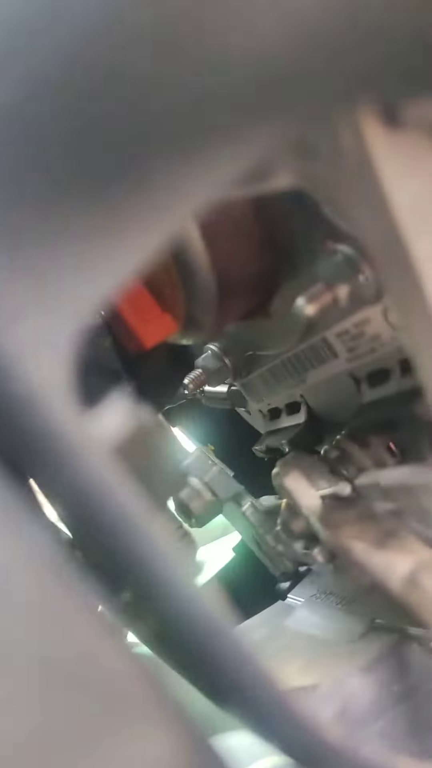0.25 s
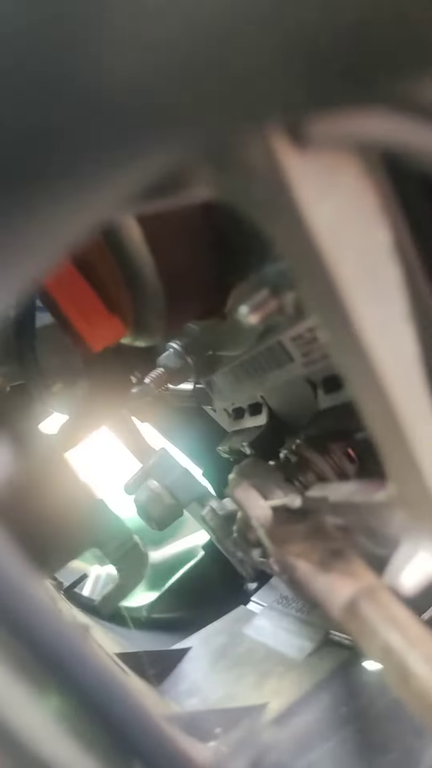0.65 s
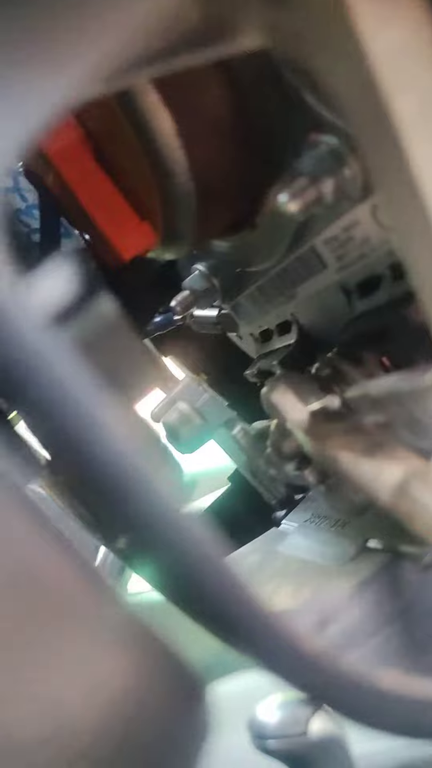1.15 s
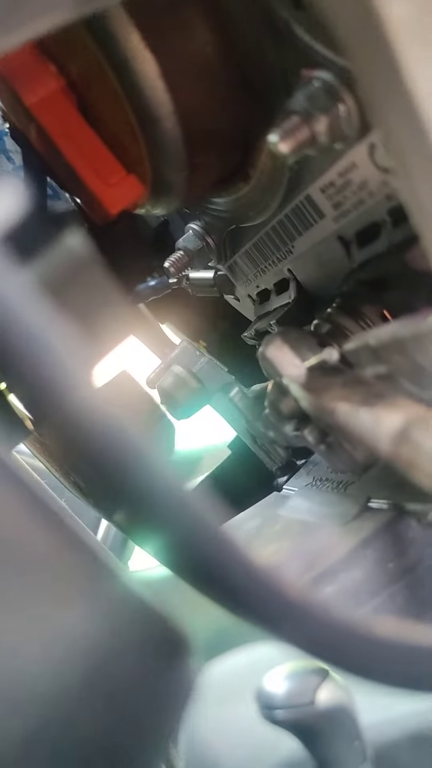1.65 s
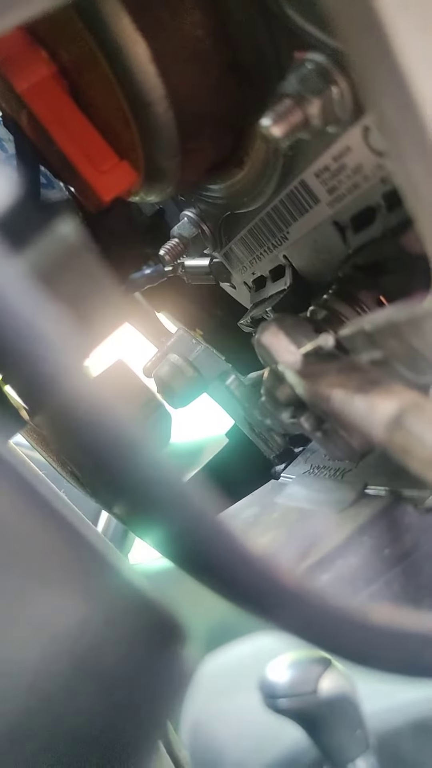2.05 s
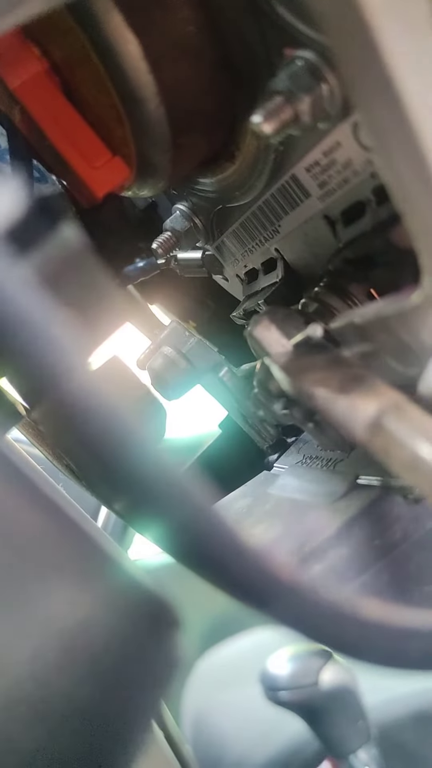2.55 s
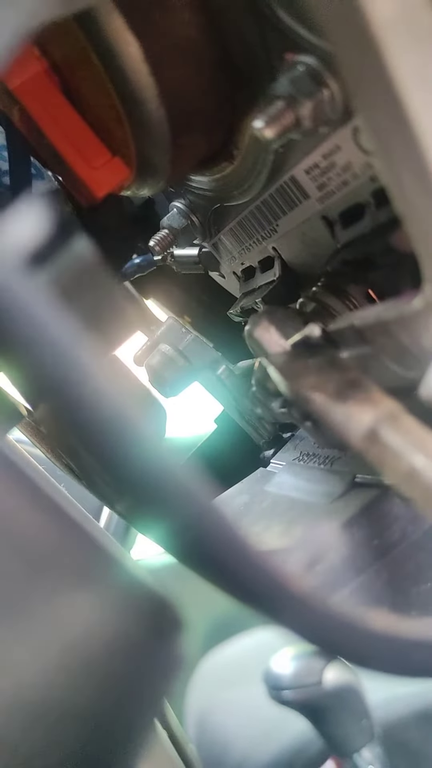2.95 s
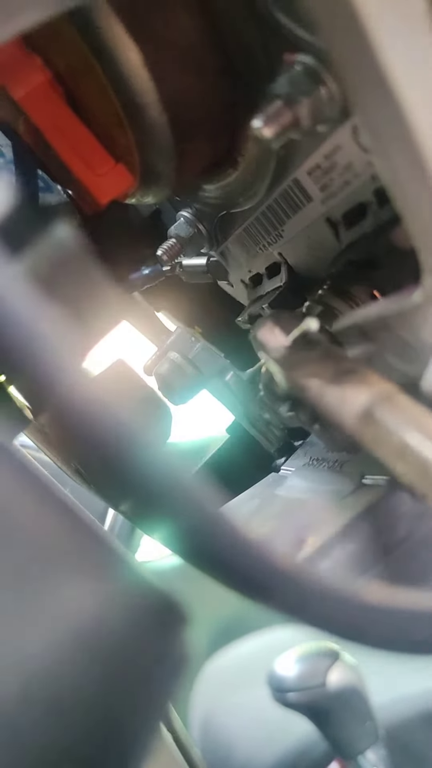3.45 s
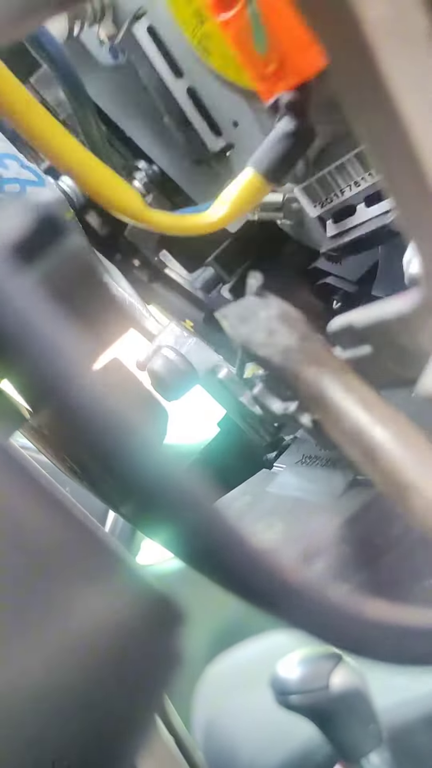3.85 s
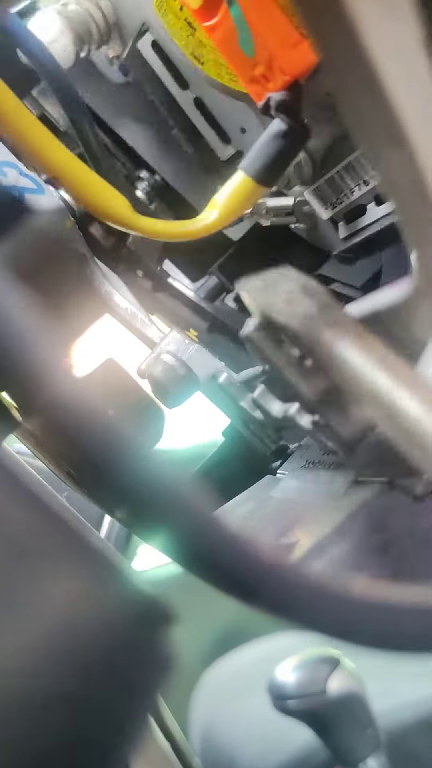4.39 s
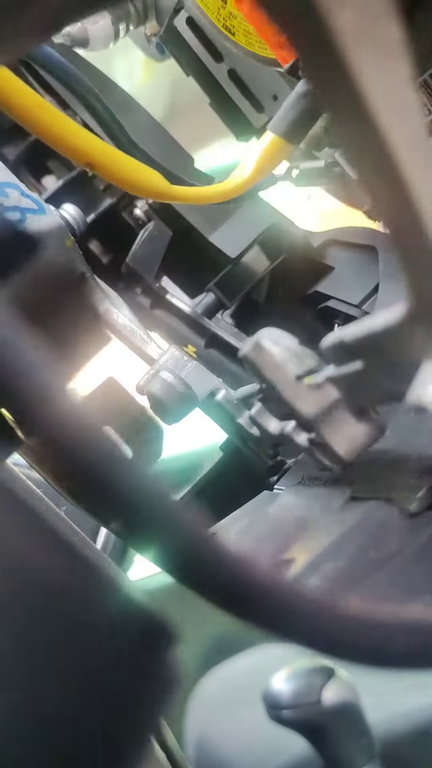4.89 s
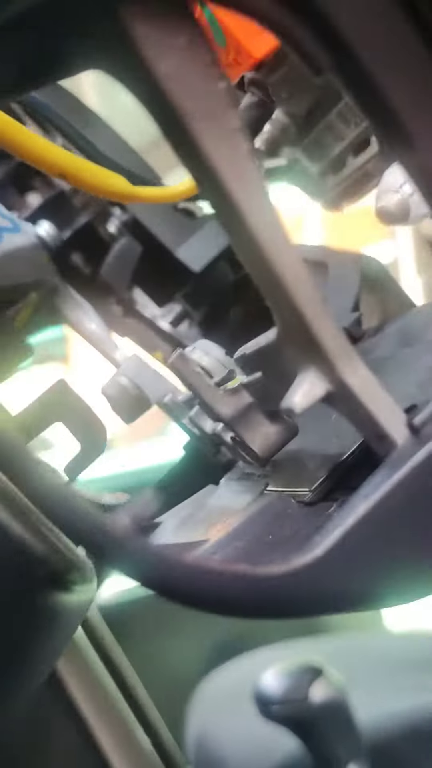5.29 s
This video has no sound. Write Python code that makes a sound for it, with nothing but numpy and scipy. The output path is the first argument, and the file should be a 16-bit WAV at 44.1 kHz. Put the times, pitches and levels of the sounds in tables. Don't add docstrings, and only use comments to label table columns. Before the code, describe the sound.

Inside a parked car, engines idle low with muffled traffic. Early on, fingers tap the phone case, which creaks briefly, and light metallic ticks follow. Late, a screwdriver springs clips in a burst of snaps and scrapes, then one very hard snap overloads the left side. Small squeaks and a stuttering scrape finish. Very close stereo phone pickup, dry short cabin echo.

```python
import sys
import numpy as np
from scipy import signal
from scipy.fft import rfft, irfft, next_fast_len
from scipy.io import wavfile
from scipy.ndimage import uniform_filter1d, map_coordinates

SR = 44100
rng = np.random.default_rng(int(sys.argv[2]) if len(sys.argv) > 2 else 0)


def master_out(mix):
    frames = np.transpose(np.atleast_2d(mix))
    ceiling = np.clip(frames, -1, 1)
    pcm = np.round(ceiling * 32767).astype(np.int16)
    wavfile.write(sys.argv[1], SR, pcm)


def makeup_ratio(level_db):
    decades = np.asarray(level_db, float) / 20
    return 10 ** decades


N = 243696

# start_s, firing_hz, level_db
NEAR_IDLE = [(0.0, 52.45, -52.5), (0.83, 50.18, -54), (1.12, 50.17, -47), (1.34, 48.2, -56),
             (1.41, 48.46, -48), (1.74, 49.52, -45.5), (1.98, 49.6, -47), (2.37, 49.05, -42.5),
             (2.91, 48.74, -46.5), (3.08, 49.23, -49), (3.2, 49.12, -43.5), (3.48, 47.94, -39.5),
             (3.84, 48.2, -43.5), (3.87, 48.57, -38), (4.45, 46.85, -41.5), (4.52, 47, -55),
             (4.62, 46.7, -39), (5.53, 45.67, -39.5)]
# centre_hz, width_hz, level_db
PANEL_MODES = [(249, 76, -1.5), (366, 120, -3.5), (536, 71, -2), (704, 64, 2), (860, 260, -4.5)]
# centre_hz, width_hz, level_db
FRAME_MODES = [(1080, 220, 2), (1570, 420, 2.5), (1840, 300, 6), (2282, 125, 3), (2715, 276, 0.5),
               (3595, 125, -4.5), (4130, 1000, -6)]
# centre_hz, width_hz, level_db
CLIP_MODES = [(4600, 580, 3.5), (5770, 1050, 1), (6350, 890, 4), (7770, 1260, 0), (10400, 3800, -12.5),
              (14500, 570, -15)]


def unit(x):
    return x / np.sqrt(np.mean(x ** 2) + 1e-20)


def along(points, hz):
    f, v = np.transpose(points)
    return np.interp(np.log(hz + 1), np.log(f + 1), v)


def curves(rows):
    s, *cols = np.transpose(rows)
    return [np.interp(np.arange(N) / SR, s, c) for c in cols]


def wobble(rate_hz):
    coarse = np.arange(0, N + 16, 16)
    knots = rng.standard_normal(int(N * rate_hz / SR) + 4)
    return np.interp(np.arange(N), coarse, map_coordinates(knots, [coarse * rate_hz / SR]))


def filtered(x, response):
    n = x.shape[-1]
    m = next_fast_len(n + 2048)
    return irfft(rfft(x, m) * response(np.fft.rfftfreq(m, 1 / SR)), m)[..., :n]


def panned(db, left_minus_right_db):
    return makeup_ratio(db + np.array([[left_minus_right_db], [-left_minus_right_db]]) / 2)


def add_at(out, s, sound):
    out[:, round(s * SR):][:, :sound.shape[1]] += sound


def resonance(f, centre_hz, width_hz):
    damping = 1j * f * width_hz
    return damping / (centre_hz * centre_hz - f * f + damping)


def body(modes, scatter_db):
    gains = makeup_ratio(scatter_db * rng.standard_normal((len(modes), 2, 1)))

    def response(f):
        return sum((-1) ** k * gains[k] * makeup_ratio(db) * resonance(f, centre_hz, width_hz)
                   for k, (centre_hz, width_hz, db) in enumerate(modes))
    return response


def soft(response, top_hz):
    return lambda f: response(f) / (1 + 1j * f / top_hz) ** 2


def pair(shape, alike):
    share = np.clip(alike, 0, 1)
    common = np.sqrt(share) * rng.standard_normal(shape)
    return common + np.sqrt(1 - share) * rng.standard_normal((2, shape))


def rush(spectrum, patchy_db):
    # freq_hz, correlation
    likeness = [(60, 0.79), (240, 0.79), (950, 0.12), (3770, -0.18), (15000, 0.51)]
    z = signal.stft(rng.standard_normal((2, N)), nperseg=512)[2]
    field = uniform_filter1d(rng.standard_normal(z.shape[1:]), size=6, axis=0)
    field = uniform_filter1d(field, size=14, axis=1)
    two = signal.istft(z * makeup_ratio(patchy_db * unit(field)), nperseg=512)[1][:, :N]

    def mid_side(hz):
        angle = np.arccos(np.clip(along(likeness, hz), -1, 1)) / 2
        return makeup_ratio(along(spectrum, hz)) * [np.cos(angle), np.sin(angle)]
    mid, side = filtered(two, mid_side)
    return unit(np.array([mid + side, mid - side]))


def engines():
    # multiple, level_db
    orders = [(1, -3), (2, -13), (3, -22), (4, -23)]
    # start_s, pitch_hz, level_db
    second_engine = [(0.0, 72.6, -62), (0.08, 74.6, -53.5), (0.48, 73.4, -53.5), (0.65, 76.25, -61),
                     (1.0, 74.3, -55), (1.2, 69.8, -61), (1.8, 69.04, -62), (1.97, 69.6, -48),
                     (3.12, 69.17, -51.5), (3.75, 68.54, -43), (3.88, 61, -35), (4.06, 56, -41),
                     (4.17, 62, -44), (4.45, 66, -43.5), (4.65, 54, -47.5), (4.95, 61, -46), (5.2, 61, -51),
                     (5.3, 62.1, -39)]
    hz, db = curves(NEAR_IDLE)
    phase = 2 * np.pi * np.cumsum(hz) / SR
    near = sum(makeup_ratio(db + order_db + 1.7 * wobble(6)) * np.sin(k * phase + 0.69 * wobble(4.93))
               for k, order_db in orders)
    hz, db = curves(second_engine)
    phase = 2 * np.pi * np.cumsum(hz) / SR
    far = makeup_ratio(db + 3.2 * wobble(6.1)) * np.sin(phase + 0.51 * wobble(4.96))
    return np.sqrt(2) * (near + far)


def street():
    # start_s, level_db
    traffic = [(0.0, -51.5), (0.23, -55.5), (1.7, -56), (3.41, -53.5), (4.12, -49.5), (4.4, -50.5),
               (4.87, -49.5), (5.52, -50)]
    # freq_hz, density_db
    rumble_spectrum = [(8.8, -36), (15, -2.5), (54, -3), (107, -4.5), (166, -18.5), (278, -25),
                       (300, -15.5), (390, -62), (660, -120)]
    # freq_hz, density_db
    hiss_spectrum = [(88, -19.5), (150, -4), (167, -10), (245, -5.5), (268, -7), (308, -5.5), (513, -13.5),
                     (755, -9), (1150, -15), (1300, -19.5), (1820, -18.5), (2700, -23), (3100, -28),
                     (5130, -35.5), (7820, -35.5), (10000, -53.5), (13000, -84), (22000, -120)]
    hiss_db, idle_db = curves(traffic)[0], curves(NEAR_IDLE)[1]
    rumble_db = -52.5 + 0.34 * (idle_db - idle_db.mean())
    rumble = makeup_ratio(rumble_db + 2.0 * wobble(4.14)) * rush(rumble_spectrum, patchy_db=0.0)
    hiss = makeup_ratio(hiss_db - 1.0 + 0.99 * wobble(6.986)) * rush(hiss_spectrum, patchy_db=1.24)
    return rumble + hiss


def chirps():
    # start_s, level_db, pitch_hz, length_s
    chirp_rows = [(.006, -51.5, 7100, 0.0029), (.006, -52, 4580, 0.0033), (3.867, -26, 2840, 0.007),
                  (3.9315, -37, 2840, .009), (4.0365, -24.5, 1840, .008), (4.039, -35, 3660, 0.0067),
                  (4.073, -39, 2960, 0.01), (4.093, -44, 3050, .011), (4.695, -53, 2370, 0.0097),
                  (4.711, -37, 2340, 0.011), (4.7245, -38, 2335, 0.011), (4.725, -46, 4800, 0.0041),
                  (4.768, -42, 1490, 0.013)]
    out, unsteady = np.zeros(N), wobble(400)
    for s, db, hz, length_s in chirp_rows:
        n = round(s * SR) + np.arange(round(length_s * SR))
        swell = np.sin(np.pi * (n - n[0]) / len(n)) ** 0.94
        out[n] += makeup_ratio(db) * swell * np.sin(2 * np.pi * hz * n / SR + 0.6 * unsteady[n])
    return out


def contacts(events, t60_s, pan_db, knock_left_db, ring_db, rise_s):
    out, t = np.zeros((2, N + SR)), np.arange(SR // 16) / SR

    def rung(response, life_s, db):
        rattle = pair(len(t), alike=0.44) * makeup_ratio(-60 * t / life_s) * (1 - np.exp(-t / rise_s))
        ring = filtered(rattle, response)
        return makeup_ratio(db) * ring / np.abs(ring).max()

    for s, db, knock_db, tinkle_db, hz in events:
        panels = soft(body(PANEL_MODES, scatter_db=3.5), top_hz=1500)
        frame = soft(body(FRAME_MODES, scatter_db=3.5), top_hz=6000)
        touched = soft(body([(hz, hz / 6, 0)], scatter_db=2.5), top_hz=2 * hz)
        clip = body(CLIP_MODES, scatter_db=2.0)
        knock = rung(panels, 0.93 * t60_s, knock_db + 4.5)
        knock = knock * makeup_ratio([[knock_left_db], [-knock_left_db]])
        rest = rung(frame, t60_s, -3) + rung(touched, t60_s, ring_db)
        rest = rest + rung(clip, 0.97 * t60_s, tinkle_db + 0.1)
        add_at(out, s, panned(db + 0.5, pan_db) * (knock + rest))
    return out[:, :N]


def ticks():
    # start_s, peak_db, knock_db, tinkle_db, ring_hz
    tick_rows = [(0.2089, -40, -11, -15, 1830), (1.027, -45, -10, -25, 1050), (1.0374, -34, -17, -20, 1130),
                 (1.0848, -34, -19, -8, 1765), (1.1657, -42, -12, -26, 1200), (1.7905, -50.5, -7, -13, 914),
                 (2.3336, -48, -10, -8, 1935), (2.611, -35.5, -12, -14, 2834), (2.6556, -55, 2, -5, 1893),
                 (3.3842, -22.5, -21, -22.5, 1800), (3.5133, -46.5, -14, -17, 3207),
                 (3.6027, -36.5, -8, -25, 1400), (3.695, -39.5, -15, -2, 2670), (3.7174, -42, -19, 3, 1703)]
    return contacts(tick_rows, t60_s=0.022, pan_db=4.0, knock_left_db=3.0, ring_db=-5.5, rise_s=0.00028)


def swings(rows):
    out, t = np.zeros((2, N + SR)), np.arange(SR // 3) / SR
    rise_s = 0.00024
    for s, db, hz, t60_s, pan_db in rows:
        swing = np.sin(2 * np.pi * hz * t) * (1 - np.exp(-t / rise_s))
        add_at(out, s, panned(db - 60 * t / t60_s, pan_db) * swing)
    return out[:, :N]


def thuds():
    # start_s, level_db, pitch_hz, t60_s, left_minus_right_db
    thud_rows = [(.438, -34, 500, 0.015, 11), (.627, -31.5, 144, 0.024, 17), (.79, -40.5, 330, 0.022, 1),
                 (.905, -43.5, 330, 0.021, 14), (3.386, -25, 316, 0.034, 12),
                 (3.384, -35.5, 208, 0.037, 24), (3.8629, -10, 890, 0.017, 9),
                 (3.863, -16.5, 716, 0.071, 5), (4, -43, 3230, .022, -2), (2.8, -42, 1760, .025, 2),
                 (4.043, -36, 1500, .02, -8), (1.085, -38, 1710, 0.027, 2), (1.039, -41, 715, 0.035, 5),
                 (3.385, -24, 2100, 0.016, 6), (3.385, -28, 1790, .025, 2), (3.99, -36, 650, .04, 5),
                 (4.05, -36, 640, .05, 5), (4.068, -37, 560, .04, 5), (4.857, -39, 730, .03, 2),
                 (4.969, -37, 650, .02, 8), (4.956, -43, 2320, .025, -4), (2.611, -47, 1100, .02, 3),
                 (.6235, -46, 2400, .006, -10), (.6525, -40, 2900, .006, -10), (3.865, -22, 106, 0.24, 3.5),
                 (3.865, -34.5, 230, 0.092, 8), (3.873, -30, 2830, 0.044, 0), (4.465, -21, 2280, 0.05, -5),
                 (4.4805, -25, 1325, 0.055, 3), (4.48, -19, 7900, .012, 6), (4.902, -36, 1500, .015, 4),
                 (4.9095, -35, 1480, .015, 2), (4.0, -38, 190, .25, 4), (3.9, -36, 760, .08, 5)]
    return swings(thud_rows)


def grip():
    # start_s, level_db, brightness_hz, left_minus_right_db
    finger_ticks = [
        (.4385, -41, 500, 16),
        (0.6234, -31, 3200, 18),
        (0.6523, -23, 3470, 15),
        (.646, -54, 5000, 17),
        (.6905, -43, 1400, 18),
        (0.9742, -50.5, 6000, 20),
    ]
    # centre_hz, width_hz, level_db
    shell_modes = [(346, 184, 1.5), (1200, 580, -0.5), (3050, 1700, -1), (6470, 3200, -4.5)]
    out = np.zeros((2, N + SR))
    impulse = np.eye(1, SR // 20)[0]
    for s, db, top_hz, pan_db in finger_ticks:
        click = filtered(impulse, soft(body(shell_modes, scatter_db=0.5), top_hz))
        add_at(out, s, panned(db, pan_db) * click / np.abs(click).max())
    return out[:, :N]


def creak():
    # start_s, level_db, slip_rate_hz
    creak_curve = [(.444, -90, 113), (.447, -52, 125), (.465, -52, 135), (.48, -51, 165), (.496, -52, 182),
                   (.501, -60, 127), (.518, -62, 120), (.53, -98, 120)]
    db, rate_hz = curves(creak_curve)
    slip_count = np.floor(np.cumsum(rate_hz * (1 + 0.079 * wobble(69.94))) / SR)
    pulses = np.diff(slip_count, prepend=0) * makeup_ratio(1.5 * wobble(100.5))
    modes = [(330, 70, 4.0), (530, 110, 0), (690, 120, -5), (860, 130, -6)]  # centre_hz, width_hz, level_db
    case = soft(body(modes, scatter_db=1.5), top_hz=1300)
    return makeup_ratio(db) * unit(filtered(pulses, case)) * makeup_ratio([[4.5], [-6.5]])


def stroke(start_s, end_s, start_db, end_db):
    edge_s, gain = 3 * 0.0088, np.zeros(N)
    span = slice(round((start_s - edge_s) * SR), round((end_s + edge_s) * SR))
    knots_s = [start_s - edge_s, start_s, end_s, end_s + edge_s]
    knots_db = [start_db - 60, start_db, end_db, end_db - 60]
    gain[span] = makeup_ratio(np.interp(np.arange(span.start, span.stop) / SR, knots_s, knots_db))
    return gain


def drags():
    # start_s, end_s, start_db, end_db, clips_over_frame_db
    blade_strokes = [(.56, 0.63, -73, -61, -11), (.7, 0.752, -69, -64, -10), (3.489, 3.558, -76, -71, -1),
                     (3.86, 3.917, -44.5, -38.5, -11), (3.93, 3.96, -42, -48, -15),
                     (3.978, 4.0, -46, -50, -13), (4.016, 4.056, -50, -47, -12),
                     (4.057, 4.104, -46.5, -49, -12), (4.288, 4.342, -74, -52, -22),
                     (4.429, 4.459, -65, -41, -15), (4.484, 4.533, -27.5, -48, -18),
                     (4.537, 4.656, -53, -62.5, -7), (4.685, 4.741, -59, -53, -25),
                     (4.766, 4.831, -64, -66, -5), (4.836, 4.879, -60, -60, 1), (4.89, 4.932, -49, -49, -3),
                     (4.931, 4.956, -50, -54, -5), (4.963, 4.974, -50, -49, -7)]
    # start_s, end_s, start_db, end_db
    shank_rubs = [
        (.55, 0.602, -59, -57),
        (4.033, 4.075, -45, -51),
        (4.856, 4.882, -53, -51),
        (4.887, 4.942, -48, -49),
        (4.945, 4.96, -57, -60),
        (4.967, 4.978, -50, -52),
        (4.69, 4.75, -56, -56),
        (4.78, 4.81, -59, -59),
    ]
    slip_hits = (rng.random(N) < 14000 / SR) * makeup_ratio(2.5 * rng.exponential(1, N)) * makeup_ratio(1.9 * wobble(90))
    grit = slip_hits * pair(N, alike=0.13)

    def rubbed(modes, top_hz):
        return unit(filtered(grit, soft(body(modes, scatter_db=2.5), top_hz)))
    frame = rubbed(FRAME_MODES, 5000)
    panels = rubbed(PANEL_MODES, 700) * makeup_ratio([[3], [-3]])
    fizz = rubbed(CLIP_MODES[:4], 16000)
    blade = sum(stroke(*row[:4]) * (frame + 0.6 * panels + makeup_ratio(row[4]) * fizz) for row in blade_strokes)
    return blade + sum(stroke(*row) for row in shank_rubs) * panels


def rings():
    # start_s, level_db, pitch_hz, t60_s, left_minus_right_db
    ring_rows = [(1.0385, -40, 1100, .022, 1), (1.0378, -37, 1560, 0.013, 3), (1.0392, -41, 2620, .02, -3),
                 (1.085, -39, 1100, .015, 2), (1.086, -46.5, 2710, .03, -3), (1.086, -49, 3950, 0.027, -3),
                 (3.6027, -44, 1940, .015, -5), (3.7174, -39, 4650, 0.016, -2),
                 (3.8627, -21.5, 2320, .015, -1), (3.863, -25.5, 4070, .025, -3),
                 (3.863, -31, 4600, .02, -5), (3.901, -32, 1750, .03, 0), (3.9, -39, 3150, .012, -5),
                 (3.9005, -32, 6700, .015, 3), (3.975, -33, 4830, .022, -7), (3.976, -38, 2950, .018, -3),
                 (4.0153, -31, 1980, .022, -1), (4.016, -39, 3020, .02, -3), (4.0153, -30.5, 510, 0.041, 6),
                 (4.067, -34, 2060, .016, -3), (4.0926, -34, 1640, .02, 0), (4.125, -47, 4040, .015, -3),
                 (4.4633, -13, 4750, .009, -3), (4.4635, -11, 7850, .016, 8),
                 (4.4635, -19, 14500, .014, -6), (4.464, -23.5, 860, .03, 1), (4.4688, -8, 3100, .006, -14),
                 (4.4688, -12, 5900, .005, -6), (4.4792, -11, 5500, .006, -8),
                 (4.4792, -9, 4300, 0.0087, -6), (4.4792, -12, 6600, .006, -4),
                 (4.48, -16, 2310, 0.028, -4), (4.8612, -37, 1480, .025, 2), (4.8884, -29, 1530, .018, 7),
                 (4.8886, -37, 2750, .012, -2), (4.9185, -29.5, 1560, .03, 2), (4.911, -34, 330, .03, 11),
                 (4.929, -36, 300, .04, 9), (4.969, -33.5, 400, .025, 8)]
    return swings(ring_rows)


def snaps():
    # start_s, peak_db, knock_db, tinkle_db, ring_hz
    snap_rows = [(3.854, -41, 0, -2, 1983), (3.8622, -12, -16, -10, 1080), (3.869, -18.5, -13, -4, 2920),
                 (3.8754, -23, -5.5, -22, 800), (3.885, -30.5, -1.5, -16, 997),
                 (3.9005, -24.5, -16, -8, 1880), (3.9315, -31, -7, -11, 2950), (3.9738, -34, -12, 3, 1400),
                 (3.9769, -28.5, -11, 1.5, 2900), (4.0153, -28, -7, -18, 1940),
                 (4.0338, -26, -18, -12, 1270), (4.0385, -19.5, -14, -16.5, 1924),
                 (4.0672, -28.5, -9, -12, 2040), (4.0735, -30.5, -11, -2, 2970),
                 (4.0926, -28.5, -20, -13, 1620), (4.124, -39, -13, -8.5, 2760),
                 (4.3331, -40.5, -9, -19, 1094)]
    return contacts(snap_rows, t60_s=0.031, pan_db=1.5, knock_left_db=2.0, ring_db=-6.0, rise_s=0.00045)


def release():
    # start_s, peak_db, knock_db, tinkle_db, ring_hz
    bounces = [
        (4.4626, -9.5, -19, 3, 2300),
        (4.4645, -10, -25, 4, 2870),
        (4.4668, -7.5, -19, 4, 2300),
        (4.479, -11.5, -17, 10, 1390),
        (4.4835, -21, -13, -6, 2800),
    ]
    return contacts(bounces, t60_s=0.012, pan_db=-4.5, knock_left_db=-1.0, ring_db=2.0, rise_s=0.00012)


def jolt():
    # start_s, level_db, recovery_s
    overloads = [
        (4.4632, -3.5, 0.017),
        (4.481, -13, 0.004),
    ]
    out = np.zeros((2, N))
    for s, db, recovery_s in overloads:
        u = np.maximum(np.arange(N) / SR - s, 0)
        settle = 1.48 * np.exp(-u / recovery_s) - 0.38 * np.exp(-u / 0.046)
        out[0] -= makeup_ratio(db) * (1 - np.exp(-u / 0.0018)) * settle
    return out


def squeaks():
    # start_s, peak_db, ring_hz
    squeak_rows = [
        (4.6676, -43.5, 1352),
        (4.6955, -35.5, 1400),
        (4.711, -31.5, 2300),
        (4.7253, -31, 2190),
        (4.771, -44, 1418),
    ]
    knock_db, tinkle_db = -13.5, -30
    events = [(s, db, knock_db, tinkle_db, hz) for s, db, hz in squeak_rows]
    return contacts(events, t60_s=0.038, pan_db=9, knock_left_db=-1.0, ring_db=-6.5, rise_s=0.0017)


def slips():
    # start_s, peak_db
    slip_rows = [(4.8555, -35), (4.8614, -36), (4.8743, -33), (4.8886, -28.5), (4.9011, -30), (4.909, -30),
                 (4.9182, -29.5), (4.9305, -35), (4.964, -37), (4.9703, -32.5)]
    # knock_db, tinkle_db, ring_hz
    slip_tone = (-10.5, -18, 1490)
    events = [tuple(row) + tuple(slip_tone) for row in slip_rows]
    return contacts(events, t60_s=0.016, pan_db=6.5, knock_left_db=1.5, ring_db=-3.5, rise_s=0.00035)


def shaded(x):
    return filtered(x, lambda f: 1 - 0.55 * resonance(f, centre_hz=1700, width_hz=900))


def cabin(x):
    # freq_hz, t60_s
    decay = [(200, 0.25), (2000, 0.08), (10000, 0.029)]
    hz, t, z = signal.stft(rng.standard_normal((2, SR // 4)), SR, nperseg=256)
    tail = signal.istft(z * makeup_ratio(-60 * t / along(decay, hz)[:, None]), SR, nperseg=256)[1]
    return signal.fftconvolve(x, tail / np.linalg.norm(tail[0]), axes=1)[:, :N]


def scene():
    work = ticks() + drags() + snaps() + release() + squeaks() + slips()
    work[1] = np.roll(work[1], 13)
    work += thuds() + rings() + chirps()
    work[1] = shaded(work[1])
    return work + makeup_ratio(-16.5) * cabin(work) + grip() + creak() + engines() + street()


def ports(x):
    # freq_hz, left_db, right_db
    port_colour = [(60, -1.5, -1), (151, -0.5, -2.5), (398, 0.5, -1.5), (1270, -0.5, -3.5), (2300, -3.5, 3),
                   (6300, -3.5, 3), (7160, 3.5, -1), (7800, 8, -26), (8500, 5.5, -25), (9000, 3, -5),
                   (10300, -1, -1.5), (14800, -1, 3)]
    hz = np.fft.rfftfreq(1024, 1 / SR)
    gains_db = [along([(p[0], p[k]) for p in port_colour], hz) for k in (1, 2)]
    ceps = irfft(np.log(makeup_ratio(gains_db)))
    ceps[:, 1:512] *= 2
    ceps[:, 513:] = 0
    return signal.fftconvolve(x, irfft(np.exp(rfft(ceps))), axes=1)[:, :N]


def band_limit(x):
    return signal.sosfilt(signal.butter(12, 16560, fs=SR, output="sos"), x)


def record(dry):
    # start_s, gain_db
    duck = [
        (4.46, 2.5),
        (4.47, -8),
        (4.53, 0),
        (4.572, -6.5),
        (4.576, 4),
    ]
    heard = ports(dry) + makeup_ratio(-72.5) * rng.standard_normal(dry.shape)
    heard = heard * makeup_ratio(curves(duck)[0]) + jolt()
    heard = heard / (1 + np.abs(heard / 0.97) ** 6) ** (1 / 6)
    heard = filtered(heard, lambda hz: hz < 16150)
    return band_limit(heard)


dry = scene()
out = record(dry)
master_out(out)
```